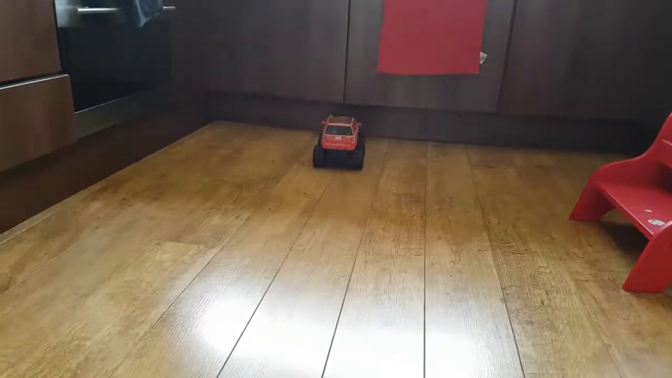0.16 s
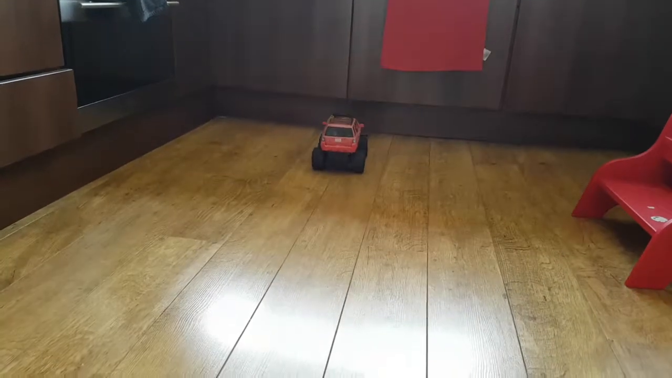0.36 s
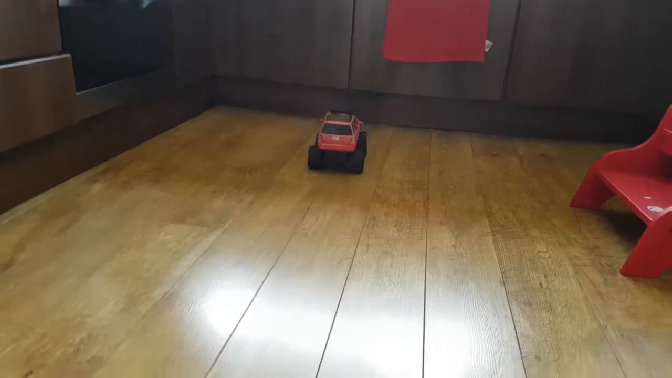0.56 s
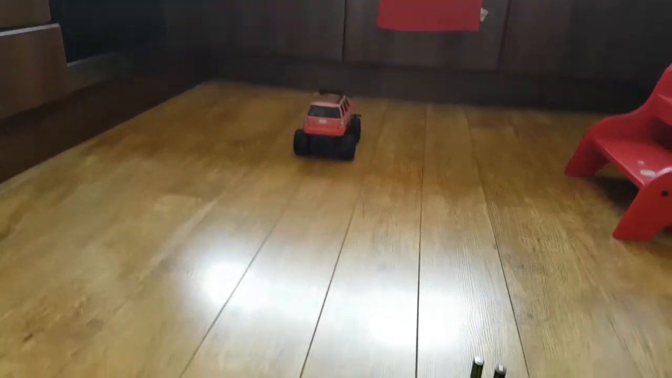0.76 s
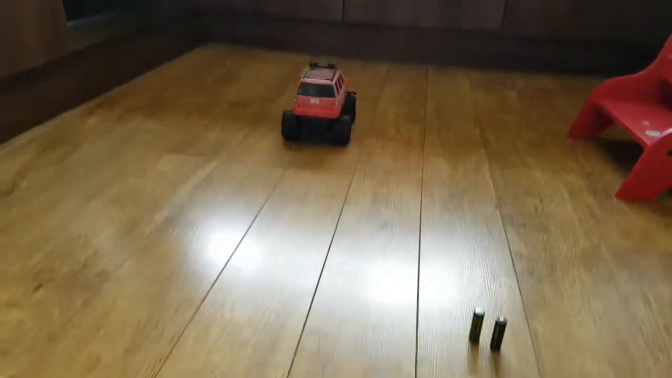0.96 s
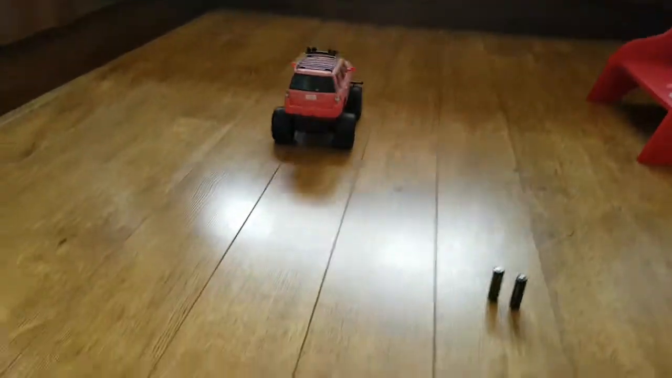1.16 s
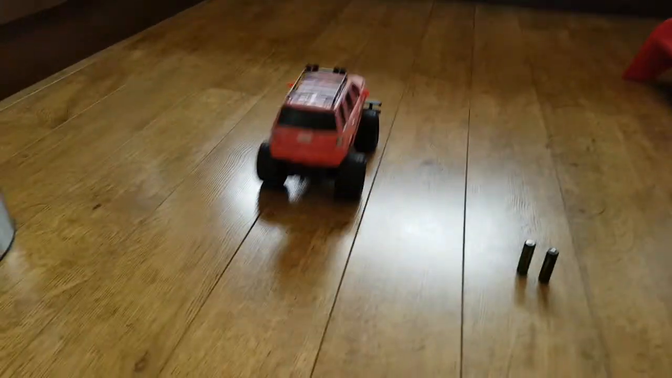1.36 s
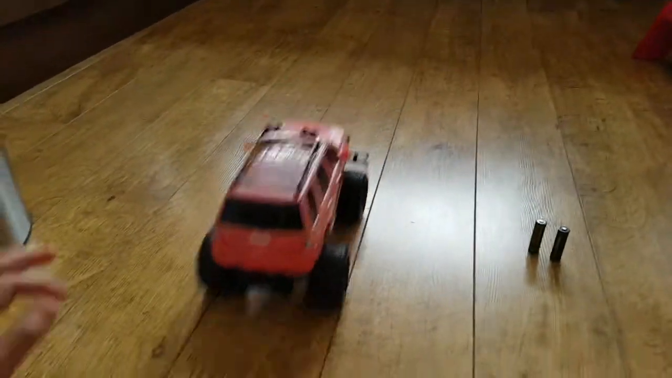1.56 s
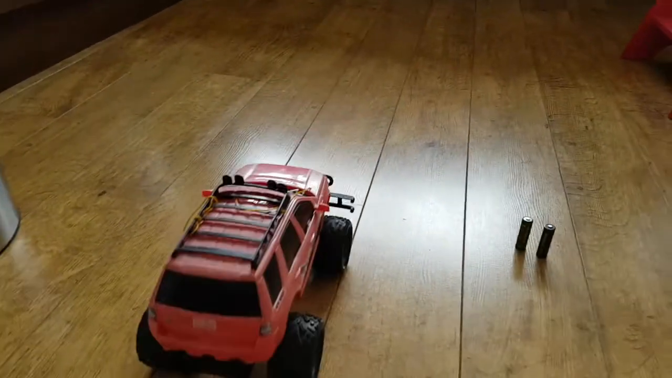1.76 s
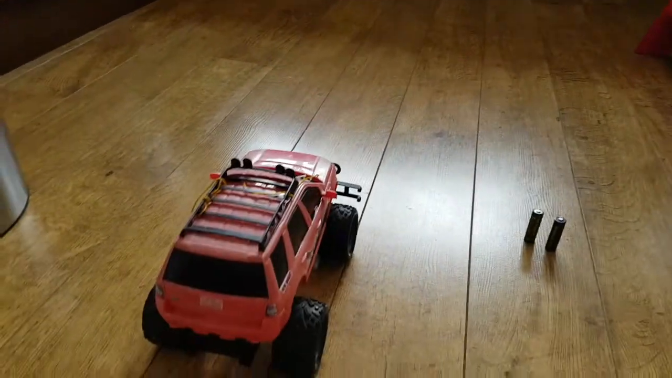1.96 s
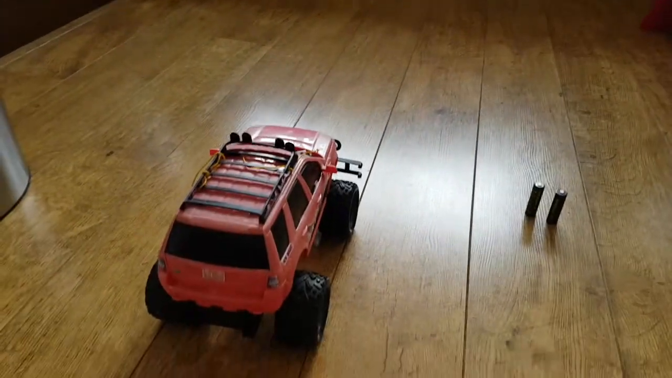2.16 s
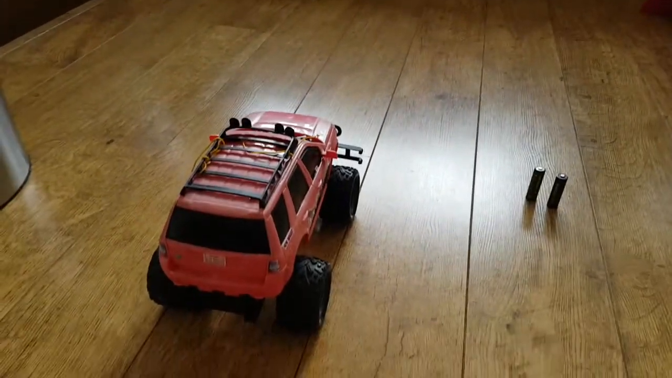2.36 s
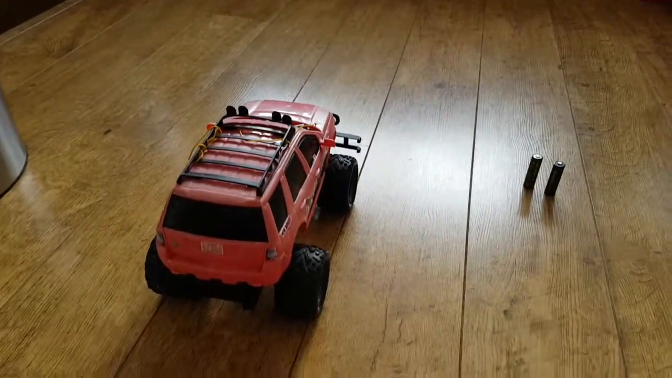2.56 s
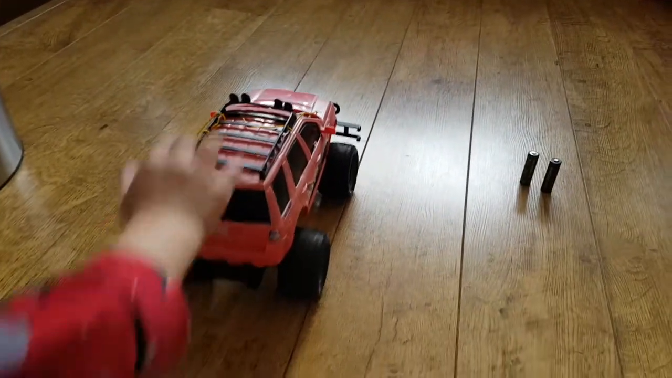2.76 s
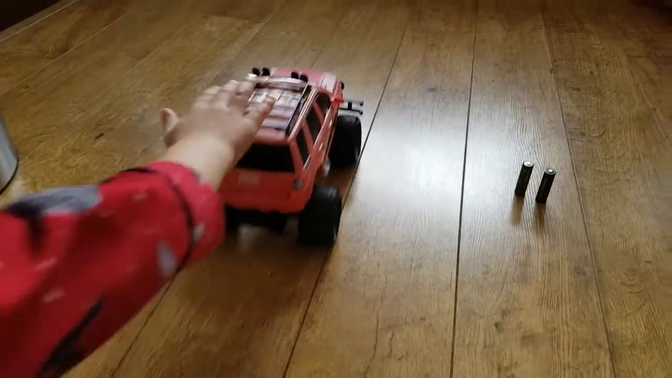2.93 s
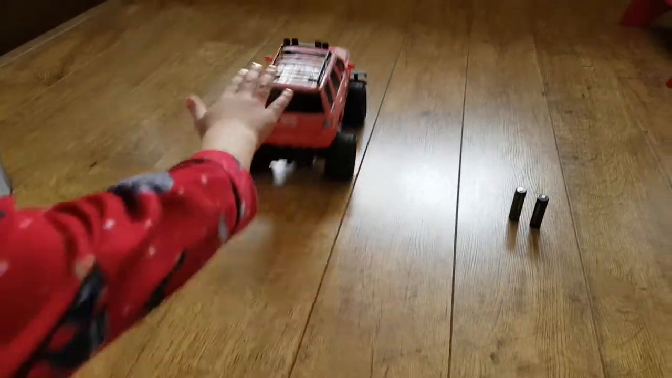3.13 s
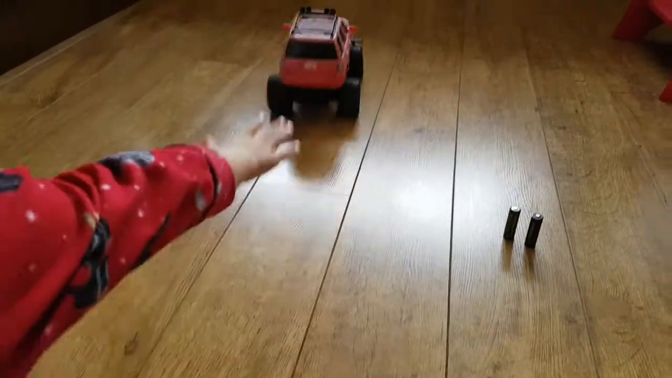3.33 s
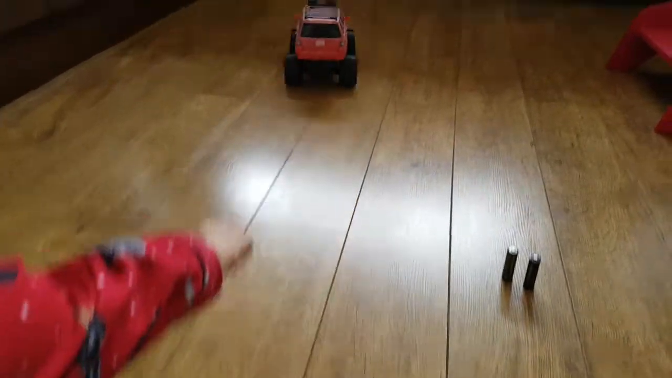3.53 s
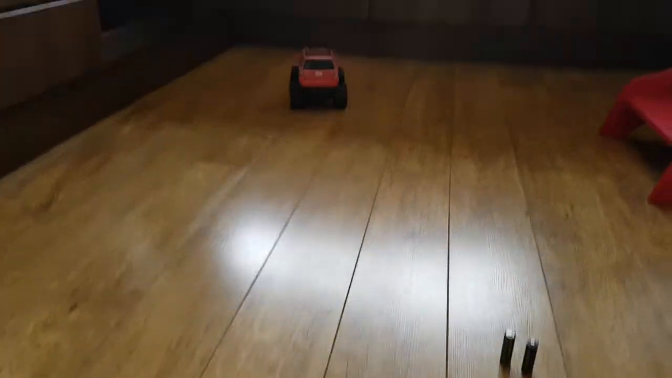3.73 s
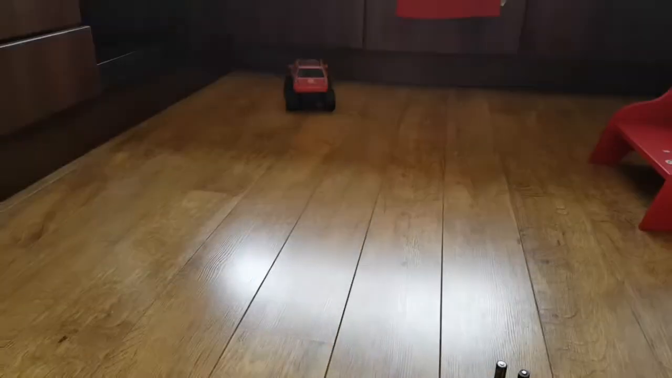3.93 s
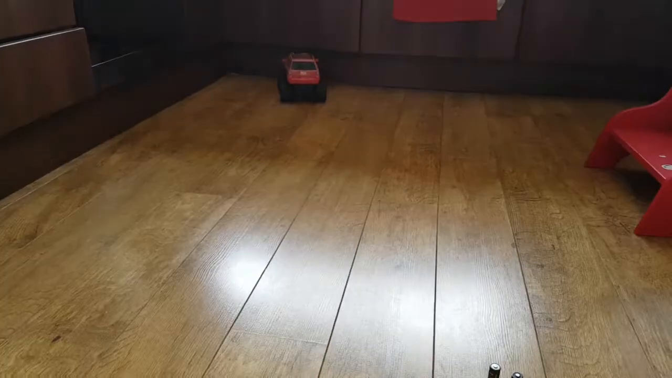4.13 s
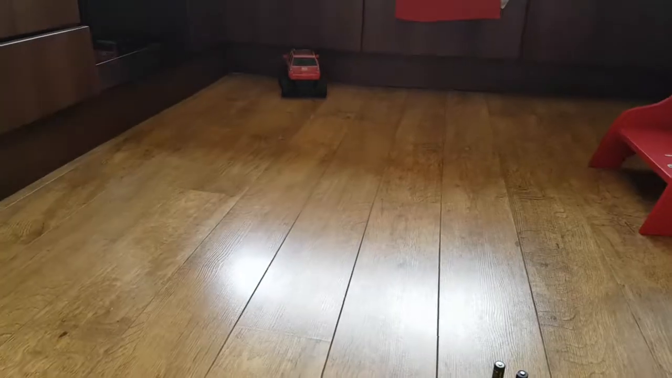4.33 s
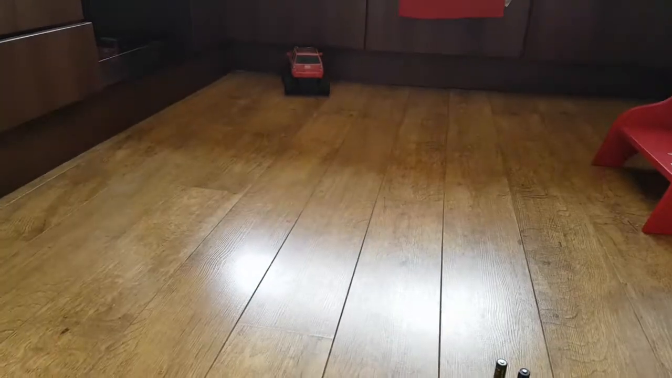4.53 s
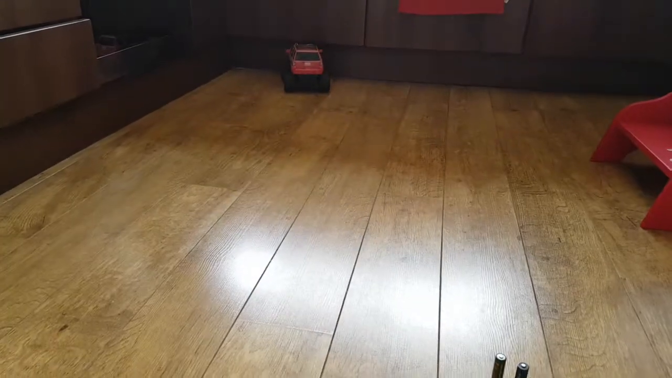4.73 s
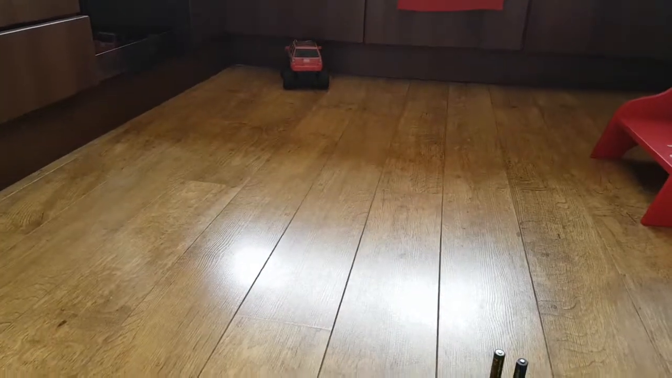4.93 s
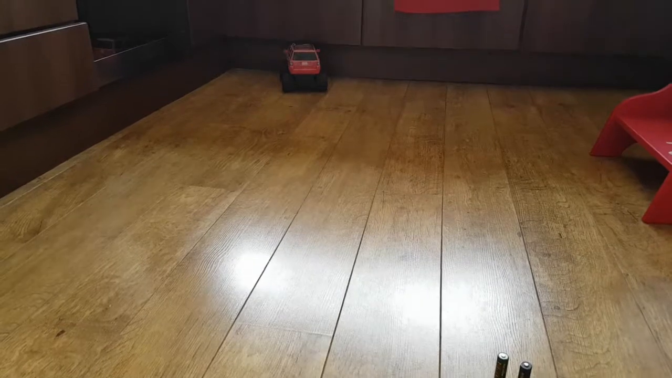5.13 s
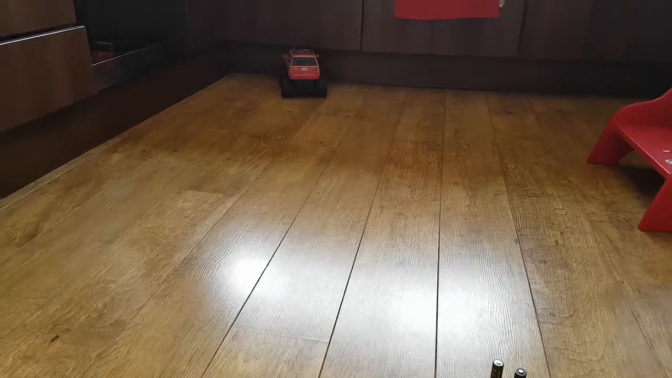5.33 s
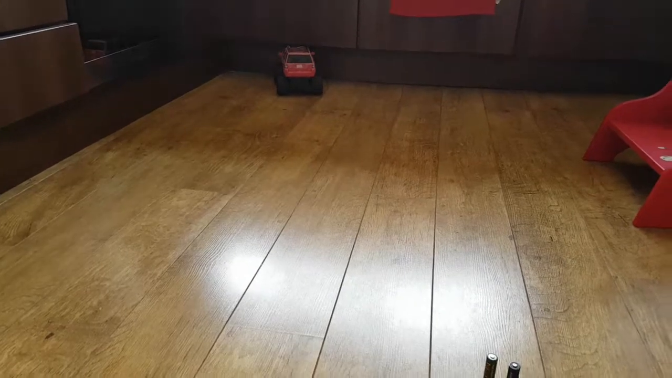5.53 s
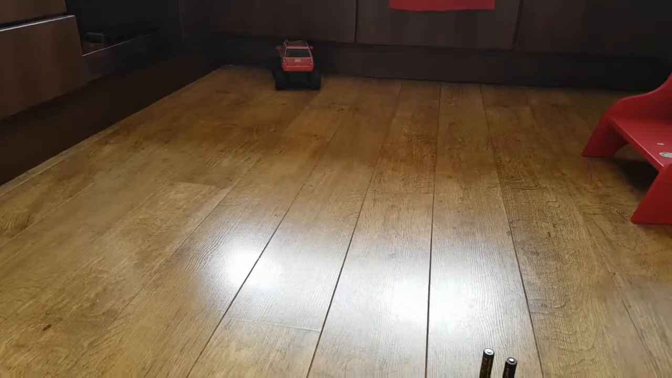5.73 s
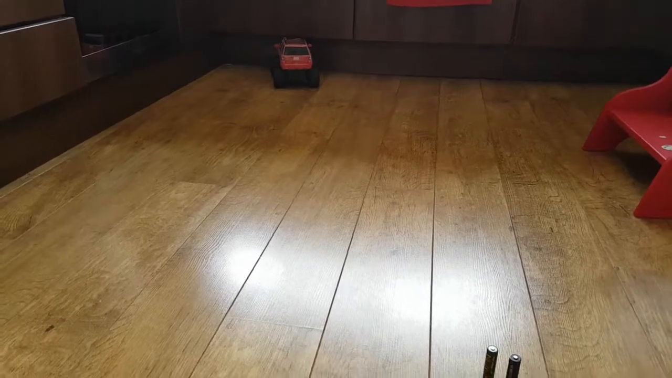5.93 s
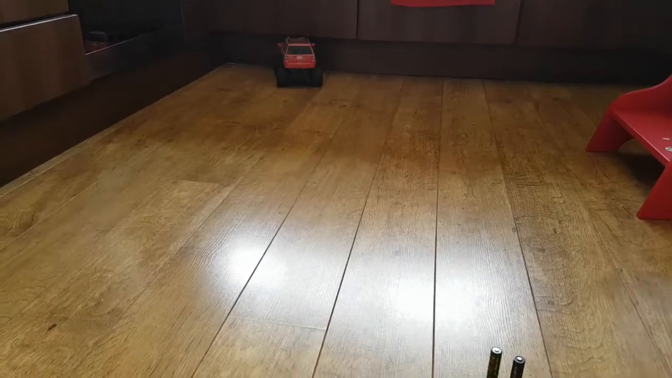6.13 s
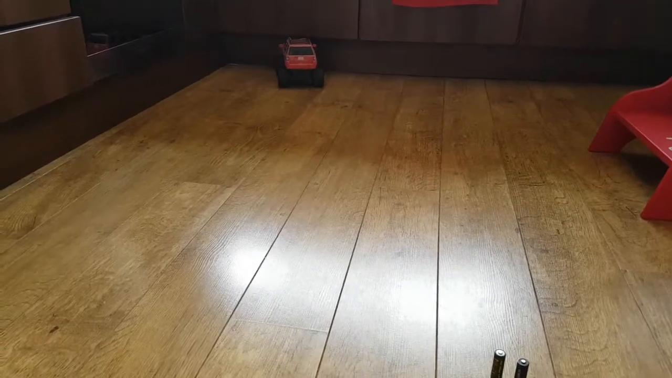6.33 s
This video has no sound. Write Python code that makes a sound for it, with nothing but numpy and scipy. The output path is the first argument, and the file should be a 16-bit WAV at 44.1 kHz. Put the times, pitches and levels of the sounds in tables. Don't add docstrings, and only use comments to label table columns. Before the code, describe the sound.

A toy truck whirs in four short bursts, reverses closer and skids to a squealing stop, then drives away and coasts to silence.

```python
import sys
import numpy as np
from scipy import signal
from scipy.fft import rfft, irfft, next_fast_len
from scipy.io import wavfile
from scipy.ndimage import uniform_filter1d, map_coordinates

SR = 44100
rng = np.random.default_rng(int(sys.argv[2]) if len(sys.argv) > 2 else 0)


def gain_from_db(level_db):
    decades = np.asarray(level_db, float) / 20
    return 10 ** decades


def to_wav(s):
    ch = np.atleast_2d(s).T
    pcm = np.round(np.clip(ch, -1, 1) * 32767)
    wavfile.write(sys.argv[1], SR, pcm.astype(np.int16))


N = 281799
TIME = np.arange(N) / SR

# frequency in Hz, level in dB per Hz.
HOUSE = [(12, -36), (20, 1), (74, -5.5), (154, -10.5), (262, -11), (301, -12), (825, -26.5), (1060, -28.5),
         (1150, -34.5), (1960, -24.5), (5080, -45.5), (7730, -41), (9400, -43.5), (13200, -33.5),
         (16000, -39.5)]
# frequency in Hz, level in dB.
FRIDGE = [(55, -68.5), (110, -77)]
HOUSE_DB = -62
# frequency in Hz, likeness from -1 to 1.
ALIKE = [(60, 0.98), (130, 1), (290, 0.88), (640, 0.52), (1410, 0.3), (3100, 0.31), (6820, 0.07),
         (15000, -0.61)]
# frequency in Hz, time to fall 60 dB in seconds.
KITCHEN = [(200, 0.98), (2000, 0.44), (10000, 0.26)]

# frequency in Hz, level in dB per Hz.
CLOTH = [(180, -14), (300, -5), (534, -2.5), (1100, -4), (2200, -6), (3600, -12.5), (5500, -23),
         (9000, -40), (12000, -120)]
# peak in seconds, rise and fall in seconds over 20 dB (sign ignored),
# low-pitched level in dB, high-pitched level in dB.
STIRS = [(1.817, 0.017, 0.19, -56.5, -63.5), (2.15, .5, 3, -76, -87), (2.452, 0.013, 2, -76, -72.5),
         (2.637, 0.24, 0.4, -67.5, -65), (2.662, 0.00477, -0.11, -42.5, -48),
         (4.4, 0.033, -0.6, -67.5, -74.5), (4.54, 0.005, 0.1, -88, -71), (4.68, .06, -1, -77.5, -84),
         (4.97, 0.6, 1.1, -74, -83), (5.07, .15, 0.15, -64.5, -61.5), (5.125, .08, .06, -68, -64),
         (5.25, .3, 0.5, -74.5, -80), (5.47, 0.17, .6, -66, -65), (5.619, 0.36, 0.03, -64.5, -63),
         (5.67, 0.056, -0.05, -68, -65.5), (5.74, .1, .2, -70, -72), (5.87, .3, 0.8, -71.5, -74),
         (6.0, 0.39, 0.1, -71.5, -65.5), (6.08, 0.098, -0.2, -68.5, -79), (6.172, .015, -1, -66, -69),
         (6.24, 0.1, -0.1, -72, -75.5), (6.355, 0.0186, 0.3, -66, -75)]
STILL_LOW_DB, STILL_HIGH_DB = -83.5, -90.5

# start in seconds, peak in dB, ring in Hz,
# treble in dB next to the peak, time to fall 60 dB in seconds.
KNOCKS = [(.044, -33, 1900, -25, .05), (.05, -27, 1900, -25, 0.034), (0.055, -14, 1940, -32.5, 0.036),
          (0.248, -17.5, 980, -12, 0.04), (0.437, -15.5, 1160, -15, 0.045),
          (1.522, -14.5, 1125, -22, 0.043), (2.452, -42.5, 2333, -16, 0.025),
          (2.55, -34.5, 1420, -30, 0.0221), (2.549, -37, 650, -30, 0.024), (2.659, -33, 1412, -19.5, .03),
          (2.661, -23, 1687, -15, 0.047), (2.667, -30, 1900, -18, .03), (2.677, -30, 1883, -25, 0.026),
          (2.878, -20.5, 2390, -28.5, 0.0096), (4.263, -37, 2380, -21.5, .04),
          (4.405, -52, 2000, -25, 0.037), (4.392, -47, 2000, -27.5, 0.02996),
          (4.476, -54, 2080, -20, 0.036), (6.118, -51.5, 1320, -25, 0.0293), (6.164, -43, 2120, -17, 0.034),
          (6.346, -46, 2040, -18, .03), (6.36, -47, 2040, -18, .03)]
# start in seconds, peak
# in dB, centre in Hz, # treble in dB next to the peak, time to fall 60 dB in seconds.
SCUFFS = [(1.811, -35.5, 1629, -17.5, 0.1034), (2.675, -41, 1835, -25.5, 0.38),
          (2.733, -30, 1700, -23.5, 0.7), (3.648, -31, 1420, -20.5, .06), (4.035, -28, 1315, -25, .15),
          (4.258, -34, 1382, -22, 0.095), (4.4, -54, 2029, -25, .2), (4.47, -56, 2060, -25, .12),
          (5.451, -46.5, 2000, -17.5, 0.131), (5.6, -50, 2540, -13.5, 0.13),
          (5.474, -40, 537, -21.5, 0.079), (5.594, -46, 545, -15.5, 0.14), (5.586, -50, 1700, -14, 0.052),
          (5.609, -47, 3000, -10, .03), (5.607, -50, 481, -13.5, 0.059), (6.163, -44, 1350, -22, 0.07),
          (6.168, -41.5, 2200, -19.5, .06), (6.344, -41.5, 2090, -18, 0.1),
          (6.358, -43.5, 1910, -18, 0.082), (6.372, -45, 2800, -15.5, .08)]
SQUEAKS = [
    (1.781, -63, 11000, -40, .035),
    (1.811, -56, 11400, -40, .045),
    (1.823, -62, 11300, -40, .035),
]
# start in seconds, peak in dB, upper ringing in dB next to the peak.
LEVER = [
    (4.337, -37.5, -5),
    (4.539, -66, -3),
    (4.84, -65, -8),
    (4.972, -61, -10),
    (5.028, -40.5, -3.5),
    (5.5537, -41.5, -12),
    (5.58, -47, -7),
    (5.735, -40.5, -4.5),
]
# frequency in Hz, time to fall 60 dB in seconds.
REMOTE_CASE = [(1300, .016), (2120, .014), (3280, .014), (3850, .011), (4750, .006)]
# start in seconds, peak in dB, frequency in Hz,
# time to fall 60 dB in seconds.
THUDS = [
    (5.035, -40.5, 68, 0.11),
    (5.076, -40, 67.45, 0.13),
    (5.167, -47.5, 67.3, 0.11),
    (6.026, -29.5, 66.15, 0.097),
    (6.061, -35.5, 70.4, 0.19),
    (6.123, -42, 64.3, 0.188),
    (6.158, -41.5, 67.33, 0.147),
    (6.228, -46.5, 68.2, 0.164),
]

# press in seconds, held for seconds, shell rattle in dB, gear tooth rate in Hz,
# whine in dB next to the rattle.
BLIPS = [
    (0.054, 0.09, -20.5, 1938, -10),
    (0.247, 0.086, -19, 1484, -9.5),
    (0.436, .11, -17.5, 1640, -10.5),
    (0.62, 0.12, -18.5, 1615, -7),
]
# press in seconds, held for seconds.
HOLDS = [
    (.795, 0.64),
    (2.66, 0.7),
]
# time in seconds, shell rattle in dB, gear tooth rate in Hz,
# whine in dB next to the rattle.
REVERSE = [
    [(.79, -25, 1647, -11), (.82, -20.5, 1668, -8.5), (.9, -19.5, 1709, -5.5), (1.05, -17.5, 1774, -12.5),
     (1.14, -18.5, 1930, -6.5), (1.31, -19, 1929, -6.5)],
    [(1.345, -20, 1607, -21.5), (1.37, -23.5, 1316, -4.5), (1.47, -28, 1300, -5.5), (1.5, -24.5, 1257, -13),
     (1.53, -27, 1147, -18), (1.545, -28, 1097, -13)],
    [(1.557, -29, 838, -8.5), (1.58, -32, 830, -11.5), (1.605, -36.5, 784, 6), (1.635, -39.5, 694, 2),
     (1.655, -36, 629, -22), (1.755, -51.5, 521.6, -20), (1.8, -67.5, 446, -27)],
]
FORWARD = [
    [(2.672, -56.5, 480.8, -1), (2.735, -40.5, 570, 4), (2.86, -31.5, 660, -3), (2.9, -30, 790.4, -12),
     (2.95, -28.5, 949.4, -3.5), (3.0, -26.5, 1090, -8), (3.05, -27.5, 1236, -3.5), (3.115, -24, 1278, -7),
     (3.22, -24, 1355, -1), (3.27, -22, 1459, -7), (3.36, -22.5, 1558, -3.5), (3.6, -22.5, 1857, -1.5)],
    [(3.625, -26, 1750, -17), (3.68, -24, 1438, -13), (3.75, -26.5, 1390, -23), (3.79, -27, 1374, -20),
     (3.97, -29, 1151, -15.5), (4.1, -33, 960, -12.5), (4.234, -41, 747, -13), (4.362, -56, 550, -29),
     (4.46, -78, 400, -18)],
]
TURN_S = 2.2
FULL_HZ = 1800
STANDBY_DB = -45
SLACK_DB, TAKE_UP_S = 5.5, 0.082
FALL_DB_PER_S, UNLOADED_DB = 167.5, 7.5
# middle in seconds, extra level in dB, half width in seconds.
BITES = [(0.101, 4.5, 0.0144), (0.143, 4.5, 0.015), (0.251, 4.0, 0.0064), (0.284, 3.5, 0.015),
         (0.305, 4.0, 0.0071), (0.52, 5, 0.004), (0.539, 5.5, 0.015), (0.681, 6, 0.015), (0.711, 4, 0.006),
         (0.833, 3.5, 0.0064), (0.894, 3, 0.0087), (1.297, 4.5, 0.0116), (1.427, 5, 0.015),
         (1.454, 4.5, 0.0054), (3.049, 4.5, 0.0099), (3.08, 5, 0.0085), (3.161, 4, 0.0129),
         (3.227, 2, 0.0136), (3.346, 2, 0.0116), (3.652, 4, 0.015)]
BITE_WHINE, BITE_RATTLE = 1.3, 0.46
GAPS = [
    (.076, -5.5, .01),
    (.266, -6, .012),
    (.456, -3, 0.0099),
    (.64, -2, 0.011),
    (.821, -8.5, 0.0041),
    (1.405, -3, .01),
]

# frequency in Hz, width in Hz, level in dB.
SHELL = [(420, 17, -13), (624, 34, -9), (830, 34, -13), (1017, 43, -6), (1300, 140, -3), (1567, 170, -6.5),
         (1670, 82, -4.5), (1920, 100, -8), (2250, 230, -10.5), (2836, 82, -7.5), (2935, 120, -7),
         (3580, 380, -10.5), (4120, 120, -12), (6210, 400, -9), (7750, 150, -9.5)]
# frequency in Hz, level in dB per Hz.
RATTLE = [(560, -43), (950, -9), (1320, -6.5), (1900, -1.5), (2700, -5.5), (2920, -6), (4480, -10.5),
          (8000, -23), (10400, -46), (17600, -120)]
TICKS_PER_S, TICK_DB, TICK_SPREAD_DB = 350, -9, 3
# time in seconds, share of this band taken away (below 0: added).
MIDRANGE_LOSS = [(0, -0.065), (.3, 0.12), (.8, 0.32), (1.2, 0.39), (1.3, 0.13), (1.52, 0), (1.57, 0.73),
                 (2.0, 0.73), (2.9, .2), (3.1, -0.25), (3.3, -0.28), (3.5, .1), (4.5, -0.024)]
MIDRANGE_HZ, MIDRANGE_WIDTH_HZ = 1230, 470
# frequency in Hz, level in dB per Hz.
FIZZ = [(2650, -26.5), (4500, 0), (7820, -2.5), (8460, -9), (9360, -13), (12100, -3.5), (12900, -4),
        (15100, -11), (16000, -33)]
BRUSH_DB = (-10, -12)
BRUSH_DB_PER_OCTAVE, BRUSH_POWER_DB, BRUSH_FLUTTER_DB = 7.5, 1, 1.6
# frequency in Hz, level in dB per Hz.
DRONE = [(160, -46.5), (280, -16), (338, -5.5), (444, -4), (486, -3.5), (696, -2.5), (950, -4),
         (1240, -29.5), (2090, -120)]
DRONE_DB = (-34, -35)
DRONE_GROWS, DRONE_POWER_DB = 0.67, 1.5

# multiple of the tooth rate, level in dB.
ORDERS = [(.86, -7.5), (1, 0), (1.13, -8), (2, -10), (4, -11)]
POWERED_STEADY, COASTING_STEADY = (0.9, 0.8), (1.3, 0.3)
SLOW_OCTAVES, SLOW_STEADY = -0.8, (3, 2.5)
SLOW_THIRD_DB, SLOW_OVERTONE_DB = -12, -30
THIRD_DB = (-13, -11)
THIRD_DB_PER_OCTAVE, THIRD_COAST_DB = -13.5, -4.5
HUNT_SHARE, HUNT_PER_S = 0.018, 35
CHATTER_DB = 2
STAGE_DB = (-14, -18)
STAGE_RATIO, STAGE_TOP_HZ = 4.45, 408
AXLE_HZ, AXLE_WIDTH_HZ, AXLE_SKIRT = 400, 28, 0.16
GRIP_S, GRIP_DB_PER_S, WHEEL_LAG_S = 1.0, 14, 0.045

# frequency in Hz, level in dB per Hz.
TYRES = [(24, -48), (40, -18.5), (108, 5.5), (140, -1.5), (205, 2.5), (253, -10), (302, -14.5), (330, 1.5),
         (430, -30.5), (730, -120)]
TYRE_DB, TYRE_GROWS, TYRE_FULL_DB = -48.5, 0.46, -31
# time in seconds, extra rumble in dB.
SEAMS = [
    (1.36, 5.5),
    (1.48, 3),
    (2.93, 4.5),
    (3.245, 1),
    (3.74, 8),
    (3.86, 6),
]
SEAM_S = 0.066
# time in seconds, frequency in Hz, level in dB.
SKID = [
    (1.52, 2244, -99),
    (1.56, 2280, -47.5),
    (1.6, 2186, -41),
    (1.65, 2296, -43.5),
    (1.7, 2277, -48.5),
    (1.75, 2297, -57.5),
    (1.83, 2250, -99),
]
# multiple, level in dB.
SKID_ORDERS = [(1.95, -8), (2.75, -8.5), (3, -12), (3.5, -11), (4.8, -16), (5.2, -11.5), (5.55, -7),
               (5.9, -10.5), (6.4, -14.5)]
# time in seconds, frequency in Hz,
# level in dB next to the rattle.
HOUSING = [(2.66, 1895, -1), (2.72, 1692, 1), (2.8, 1750, -9.5), (2.97, 1850, -5), (3.05, 1745, -10),
           (3.15, 1910, -20), (3.33, 1864, -7.5), (3.45, 2046, -11), (3.58, 2057, -7), (3.64, 2150, -29),
           (3.78, 2094, -33), (3.9, 2145, -7), (4.0, 2250, -15), (4.2, 2128, -7.5), (4.3, 2054, -12),
           (4.45, 2000, -4)]
# time in seconds, frequency in Hz, level in dB next to the rattle.
CAN = [
    (3.1, 4080, -45),
    (3.125, 4100, -10),
    (3.2, 4060, -14),
    (3.3, 4120, -14),
    (3.35, 4100, -45),
]
# time in seconds, left minus right in dB.
PLACE = [(0, 0.06), (1.42, -0.5), (1.6, 3), (2.72, 1.5), (2.93, -0.5), (4.5, -0.8)]

# frequency in Hz, left minus right in dB.
BALANCE = [(60, 5), (110, 2), (200, 0.5), (380, 6.5), (700, 4), (1290, 6.5), (2380, 4), (4400, 1.5),
           (8120, -7), (15000, 13)]
# frequency in Hz, lead of the left one in radians.
LEAD = [(0, 0), (220, 0.19), (1030, 0.73), (1380, 1.3), (1810, 0.19), (8010, 1.97), (16000, 1)]
TOP_HZ = 15880


def unit(x):
    return x / np.sqrt(np.mean(x ** 2) + 1e-20)


def along(points, hz):
    f, v = np.transpose(points)
    return np.interp(np.log(hz + 1), np.log(f + 1), v)


def curves(rows):
    s, *columns = np.transpose(rows)
    return [np.interp(TIME, s, column) for column in columns]


def bumps(rows):
    return sum(db * np.exp(-((TIME - s) / width) ** 2) for s, db, width in rows)


def wobble(rate):
    return map_coordinates(rng.standard_normal(N // 8), [TIME * min(rate, 5000)])


def filtered(x, response):
    m = next_fast_len(N + SR // 2)
    return irfft(rfft(x, m) * response(np.fft.rfftfreq(m, 1 / SR)), m)[..., :N]


def resonance(f, hz, width):
    return 1j * f * width / (hz ** 2 - f * f + 1j * f * width)


def rush(spectrum, grain_db, patchy_db, colour=lambda f: 1):
    grains = rng.standard_normal((2, N)) * gain_from_db(grain_db * wobble(700))
    z = signal.stft(grains, nperseg=512)[2]
    field = uniform_filter1d(rng.standard_normal(z.shape[1:]), size=2, axis=0)
    field = uniform_filter1d(field, size=14, axis=1)
    pair = signal.istft(z * gain_from_db(patchy_db * unit(field)), nperseg=512)[1][:, :N]

    def response(hz):
        turn = np.arccos(np.clip(along(ALIKE, hz), -1, 1)) / 2
        return colour(hz) * gain_from_db(along(spectrum, hz)) * np.array([np.cos(turn), np.sin(turn)])

    mid, side = filtered(pair, response)
    return unit(np.array([mid + side, mid - side]))


def whine(hz, orders, steady, rate):
    turns = np.cumsum(hz * np.ones(N)) / SR
    out = 0
    for multiple, db in orders:
        wear = (steady + wobble(rate) + 1j * wobble(rate)) / np.sqrt(1 + steady ** 2 / 2)
        out = out + gain_from_db(db) * np.real(wear * np.exp(2j * np.pi * multiple * turns))
    return out


def room(x, wet_db):
    hz, t, z = signal.stft(rng.standard_normal((2, SR // 2)), SR, nperseg=256)
    tail = signal.istft(z * gain_from_db(-60 * t / along(KITCHEN, hz)[:, None]), SR, nperseg=256)[1]
    tail = tail / np.linalg.norm(tail[0])
    return x + gain_from_db(wet_db) * signal.fftconvolve(np.atleast_2d(x), tail, axes=1)[:, :N]


def house():
    fridge = sum(gain_from_db(db) * whine(hz, [(0.98, 0.0065)], steady=1.3, rate=17) for hz, db in FRIDGE)
    return gain_from_db(HOUSE_DB + 0.39 * wobble(6.5)) * rush(HOUSE, 0.1, 2.2) + fridge


def rustle():
    low, high = gain_from_db(STILL_LOW_DB) ** 2, gain_from_db(STILL_HIGH_DB) ** 2
    for s, rise, fall, low_db, high_db in STIRS:
        shape = gain_from_db(-40 * np.abs(TIME - s) / np.abs(np.where(TIME < s, rise, fall)))
        low = low + gain_from_db(low_db) ** 2 * shape
        high = high + gain_from_db(high_db) ** 2 * shape
    soft = gain_from_db(5) * np.sqrt(low) * rush(CLOTH, 3, 3)
    return soft + gain_from_db(-0.5) * np.sqrt(high) * rush(FIZZ, 2.5, 1.5)


def noise_band(low_hz, high_hz, length):
    coefficients = signal.butter(2, [low_hz, high_hz], "bandpass", fs=SR)
    return signal.lfilter(*coefficients, rng.standard_normal(length))


def contacts(events, ring_share, rise):
    out, t = np.zeros(N + SR), np.arange(SR // 4) / SR
    for s, db, hz, treble_db, t60 in events:
        ring = 0
        for k in (1, 1.5, 2.5, 3.7):
            size = rng.uniform(0.42, 1) * (hz * k < SR / 2) / k ** 2
            ring = ring + size * gain_from_db(-25 * k * t / t60) * np.sin(2 * np.pi * hz * k * t)
        puff = 0.45 * unit(noise_band(0.69 * hz, 1.42 * hz, len(t)))
        treble = gain_from_db(treble_db) * unit(noise_band(3100, 13500, len(t)))
        crack = 0.5 * gain_from_db(-60 * t / 0.0096) * unit(noise_band(500, 6500, len(t)))
        shape = gain_from_db(db - 60 * t / t60) * (1 - np.exp(-t / rise))
        out[round(s * SR):][:len(t)] += shape * (ring_share * ring + puff + treble + crack)
    return out[:N]


def knocks():
    return room(contacts(KNOCKS, 0.45, rise=0.0015), -14)


def press(s, held):
    return 1.0 * (TIME >= s) * (TIME < s + held)


def way(pair):
    return np.where(TIME < TURN_S, *pair)


def motor():
    power = uniform_filter1d(sum(press(*row[:2]) for row in BLIPS + HOLDS), size=900)
    runs = np.vstack(REVERSE + FORWARD)
    before_runs = TIME < runs[0, 0]
    rattle_db = np.where(before_runs, STANDBY_DB, curves(runs)[0])
    for s, held, db, *_ in BLIPS:
        after = np.maximum(TIME - s, 0)
        blip_db = db - SLACK_DB * np.exp(-after / TAKE_UP_S)
        blip_db = blip_db - FALL_DB_PER_S * np.maximum(after - held, 0)
        rattle_db = np.maximum(rattle_db, np.where(TIME >= s, blip_db, -99))
    rattle_db = uniform_filter1d(rattle_db + bumps(GAPS), size=150)
    peaks = [(s + held * 0.8, hz, db) for s, held, _, hz, db in BLIPS]
    mesh_hz, load_db = curves(peaks + [(s, hz, db) for s, _, hz, db in runs])
    load_db = load_db - UNLOADED_DB * (1 - power) * before_runs
    return power, rattle_db, mesh_hz, load_db


def shell(f):
    return sum((-1) ** k * gain_from_db(db) * resonance(f, hz, width) for k, (hz, width, db) in enumerate(SHELL))


def ticks():
    chance, size = rng.random(N), np.minimum(rng.exponential(1, N), 3)
    hits = (chance < TICKS_PER_S / SR) * gain_from_db(TICK_SPREAD_DB * size)

    def response(f):
        softness = 1j * f / (900 + 1j * f) / (1 + 1j * f / 5000)
        return (shell(f) + 0.1) * softness ** 2

    return gain_from_db(TICK_DB) * unit(filtered(hits, response))


def clatter():
    rattle = rush(RATTLE, 1.4, 2.4, lambda f: 0.3 + np.abs(shell(f))) + ticks()
    midrange = filtered(rattle, lambda f: resonance(f, MIDRANGE_HZ, MIDRANGE_WIDTH_HZ))
    return rattle - curves(MIDRANGE_LOSS)[0] * midrange


def brushes(power, octaves):
    level_db = way(BRUSH_DB) + BRUSH_DB_PER_OCTAVE * octaves + BRUSH_POWER_DB * power + 2.5
    return gain_from_db(level_db + BRUSH_FLUTTER_DB * wobble(30)) * rush(FIZZ, 1.1, 1.5)


def chassis(power, rattle_db):
    level_db = way(DRONE_DB) + DRONE_GROWS * (rattle_db + 19.5) + DRONE_POWER_DB * power
    return gain_from_db(level_db - rattle_db) * rush(DRONE, 0.72, 2.8)


def gear_teeth(power, rattle_db, mesh_hz, load_db, octaves):
    slow = np.clip(SLOW_OCTAVES - octaves, 0, 0.6)
    steady = power * way(POWERED_STEADY) + (1 - power) * way(COASTING_STEADY) + way(SLOW_STEADY) * slow
    third_db = way(THIRD_DB) + THIRD_DB_PER_OCTAVE * np.maximum(octaves, SLOW_OCTAVES)
    third_db = third_db + THIRD_COAST_DB * (1 - power) + SLOW_THIRD_DB * slow
    orders = [(k, db + (k > 1) * SLOW_OVERTONE_DB * slow) for k, db in ORDERS]
    hunting_hz = mesh_hz * (1 + HUNT_SHARE * power * wobble(HUNT_PER_S))
    teeth = whine(hunting_hz, orders, steady, rate=300)
    teeth = teeth + whine(hunting_hz, [(3, third_db)], 0.7, rate=330)
    chatter_db = CHATTER_DB * power * (wobble(21.987) - 0.42)
    push = gain_from_db(rattle_db + load_db + BITE_WHINE * bumps(BITES) + chatter_db) * teeth
    return gain_from_db(7) * filtered(push, lambda f: 0.14 + np.abs(shell(f)))


def axle_hum(rattle_db, mesh_hz, throb):
    keep = np.exp(-1 / (WHEEL_LAG_S * SR))
    lagging_hz = signal.lfilter([1 - keep], [1, -keep], mesh_hz)
    stage_hz = np.minimum(lagging_hz / STAGE_RATIO, STAGE_TOP_HZ)
    grip_db = GRIP_DB_PER_S * np.minimum(TIME - GRIP_S, 0)
    hum = whine(stage_hz * (1 + 0.03 * throb), [(1, 0), (2, 2)], steady=2, rate=70)
    hum = gain_from_db(rattle_db + way(STAGE_DB) + grip_db) * hum
    return filtered(hum, lambda f: AXLE_SKIRT + resonance(f, AXLE_HZ, AXLE_WIDTH_HZ))


def tyres(rattle_db):
    seams_db = bumps([(s, db, SEAM_S) for s, db in SEAMS])
    level_db = TYRE_DB + TYRE_GROWS * np.minimum(rattle_db - TYRE_FULL_DB, 0) + seams_db
    return gain_from_db(level_db + 0.9 * wobble(25)) * rush(TYRES, 0.1, 0.58)


def skid(skid_hz, skid_db):
    squeal = whine(skid_hz, SKID_ORDERS, steady=0.1, rate=900)
    rough = whine(skid_hz, [(0.94, -1), (1.06, -2), (1.3, -8)], steady=0.2, rate=300)
    return gain_from_db(skid_db) * (squeal + rough)


def housing(rattle_db):
    housing_hz, housing_db = curves(HOUSING)
    gears = whine(housing_hz, [(1, 0), (1.36, -8)], steady=0.2, rate=300)
    gears = (TIME > TURN_S) * gain_from_db(rattle_db + housing_db) * gears
    can_hz, can_db = curves(CAN)
    can_level = gain_from_db(rattle_db + can_db + 2 * wobble(30))
    return gears + can_level * whine(can_hz, [(1, 0)], steady=1.5, rate=120)


def sounding(spans):
    inside = sum(1.0 * (TIME >= start) * (TIME <= end + 0.01) for start, end in spans)
    return uniform_filter1d(np.minimum(inside, 1), size=200, mode="nearest")


def truck():
    power, rattle_db, mesh_hz, load_db = motor()
    octaves = np.log2(mesh_hz / FULL_HZ)
    throb = 0.7 * wobble(25) + 0.5 * wobble(90)
    skid_hz, skid_db = curves(SKID)
    locked = gain_from_db(-np.clip(skid_db + 60, 0, 5))
    rough = locked * (clatter() + chassis(power, rattle_db)) + brushes(power, octaves)
    rough = gain_from_db(rattle_db - 0.5 + throb + BITE_RATTLE * bumps(BITES)) * rough
    teeth = gear_teeth(power, rattle_db, mesh_hz, load_db, octaves)
    ringing = room(teeth + skid(skid_hz, skid_db) + housing(rattle_db), -13)
    heard = ringing + axle_hum(rattle_db, mesh_hz, throb) + rough
    pan_db = curves(PLACE)[0]
    heard = heard * gain_from_db(np.array([pan_db, -pan_db]) * 0.53)
    moving = sounding([(0, REVERSE[-1][-1][0]), (FORWARD[0][0][0], FORWARD[-1][-1][0])])
    return moving * (heard + tyres(rattle_db))


def scuffs():
    drags = gain_from_db(3.5 * wobble(220)) * contacts(SCUFFS, 0.15, rise=0.005)
    return room(drags + contacts(SQUEAKS, 4, rise=0.003), -14)


def lever():
    out, t = np.zeros(N + SR), np.arange(SR // 10) / SR
    for s, db, upper_db in LEVER:
        ring = 0
        for hz, t60 in REMOTE_CASE:
            level_db = (hz > 2500) * (upper_db + 5.5) + rng.normal(0, 3.1)
            tone = np.sin(2 * np.pi * hz * rng.normal(1, 0.021) * t)
            ring = ring + gain_from_db(level_db - 60 * t / t60) * tone
        snap = 1.8 * gain_from_db(-60 * t / 0.0098) * noise_band(600, 6000, len(t))
        out[round(s * SR):][:len(t)] += gain_from_db(db + 5) * (1 - np.exp(-t / 0.002)) * (ring + snap)
    return room(out[:N], -14)


def thuds():
    out, t = np.zeros(N + SR), np.arange(SR // 2) / SR
    for s, db, hz, t60 in THUDS:
        cycles = hz * (t + 0.5 * 0.015 * (1 - np.exp(-t / 0.0064)))
        rise = (1 - np.exp(-t / 0.0025)) ** 2
        out[round(s * SR):][:len(t)] += gain_from_db(db + 1.5 - 60 * t / t60) * rise * np.sin(2 * np.pi * cycles)
    return out[:N]


def scene():
    return house() + rustle() + knocks() + truck() + scuffs() + lever() + thuds()


def band_limit(x):
    return signal.sosfilt(signal.butter(12, 16440, fs=SR, output="sos"), x)


def record(dry):
    side = np.array([[1], [-1]])

    def microphones(hz):
        tone = gain_from_db(along(BALANCE, hz) * 0.21 * side)
        return (hz < TOP_HZ) * tone * np.exp(0.5j * along(LEAD, hz) * side)

    return band_limit(filtered(dry, microphones))


dry = scene()
out = record(dry)
to_wav(out)
```